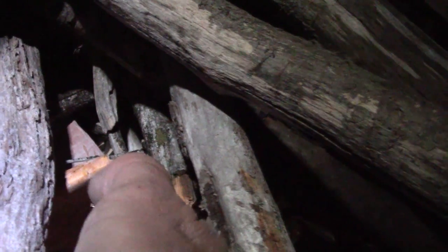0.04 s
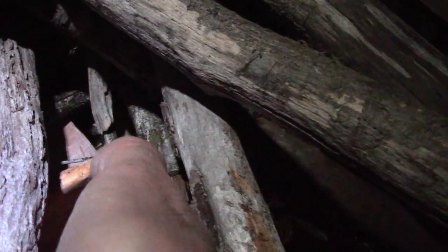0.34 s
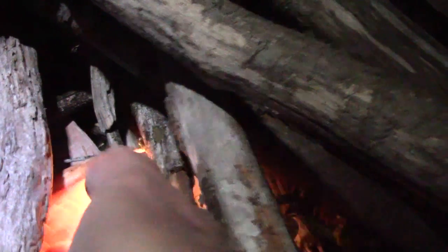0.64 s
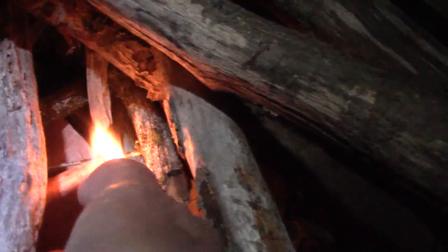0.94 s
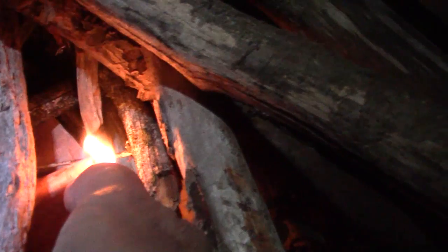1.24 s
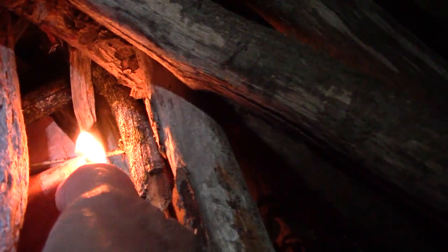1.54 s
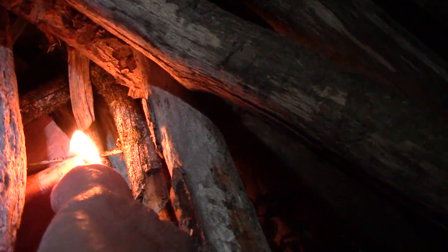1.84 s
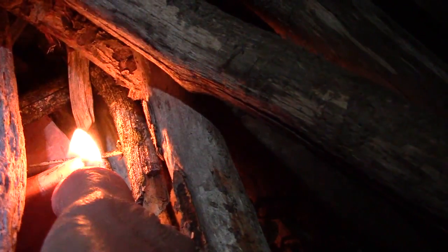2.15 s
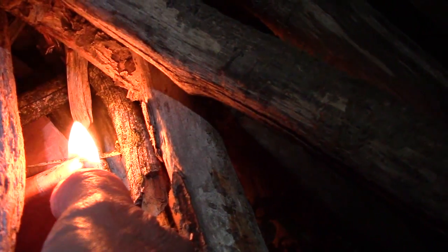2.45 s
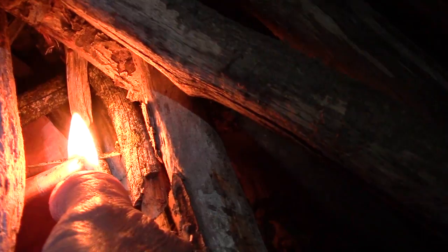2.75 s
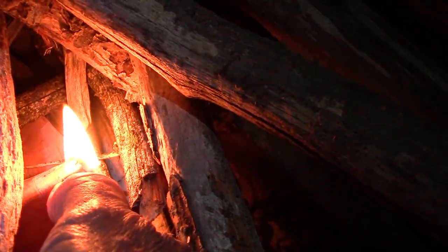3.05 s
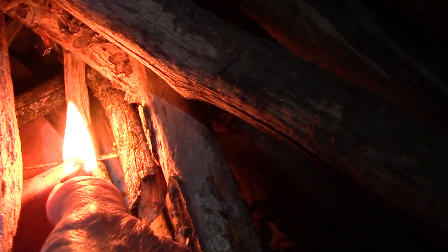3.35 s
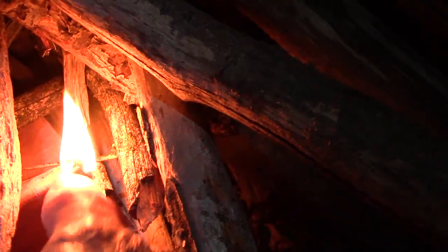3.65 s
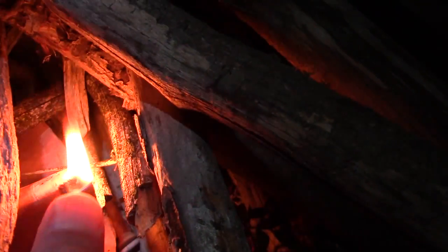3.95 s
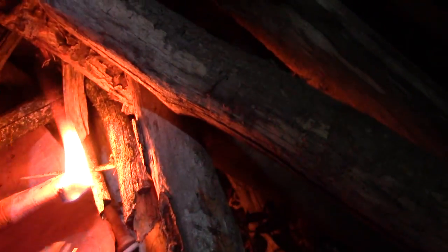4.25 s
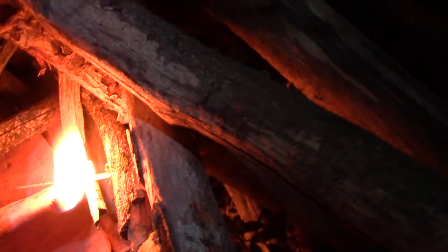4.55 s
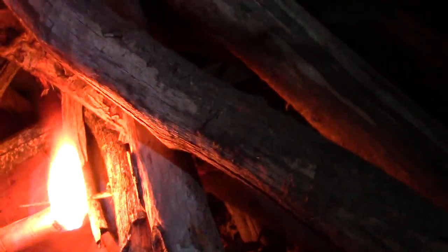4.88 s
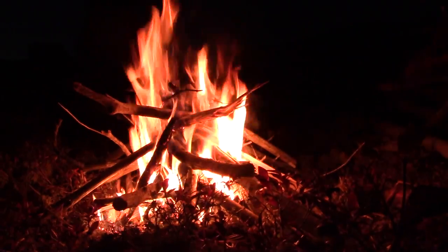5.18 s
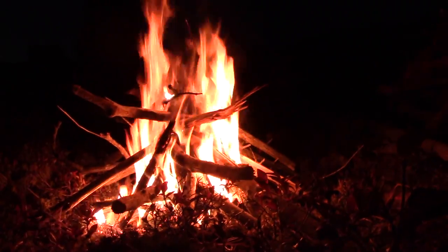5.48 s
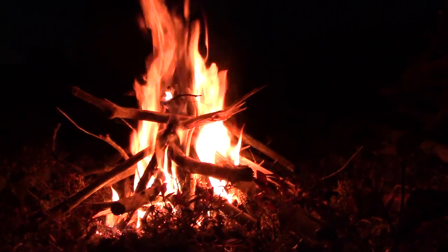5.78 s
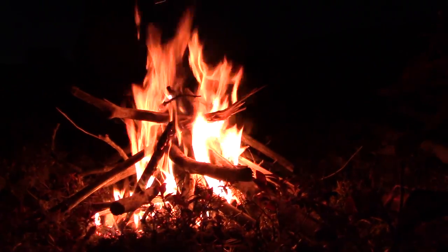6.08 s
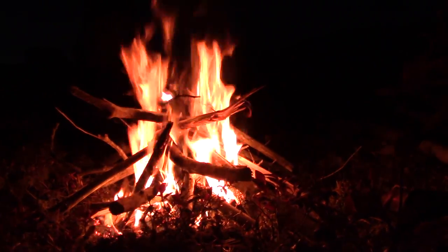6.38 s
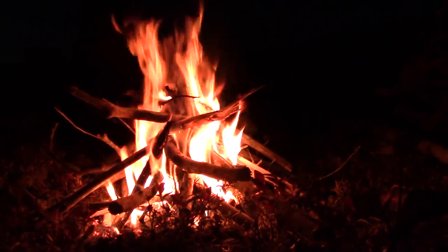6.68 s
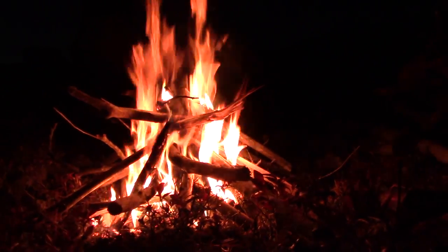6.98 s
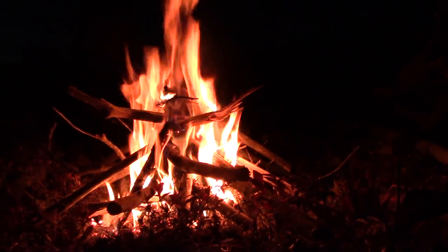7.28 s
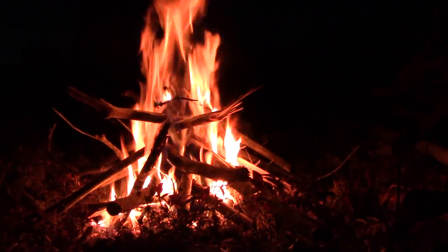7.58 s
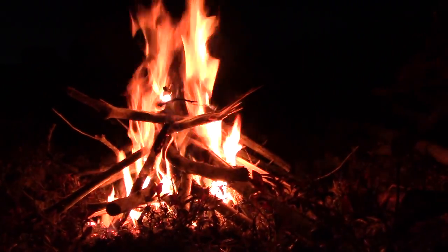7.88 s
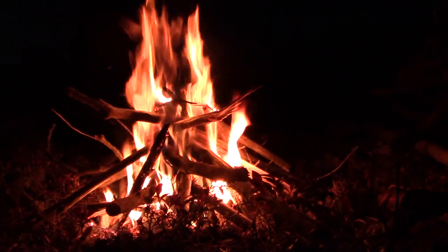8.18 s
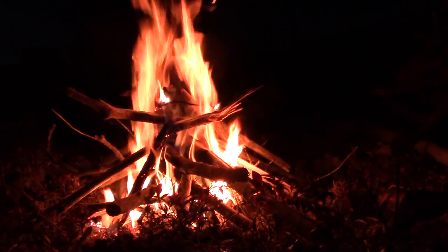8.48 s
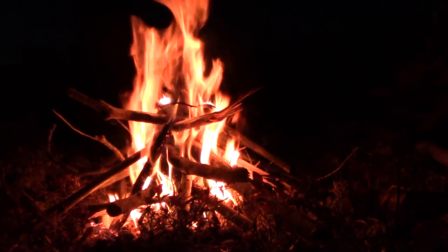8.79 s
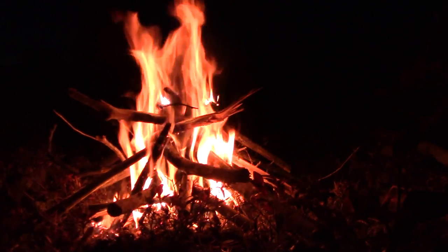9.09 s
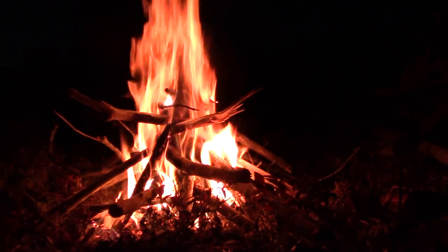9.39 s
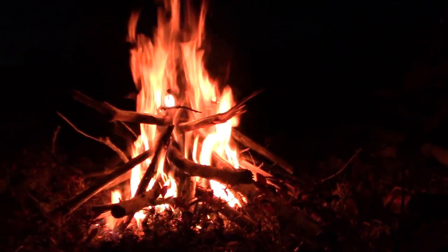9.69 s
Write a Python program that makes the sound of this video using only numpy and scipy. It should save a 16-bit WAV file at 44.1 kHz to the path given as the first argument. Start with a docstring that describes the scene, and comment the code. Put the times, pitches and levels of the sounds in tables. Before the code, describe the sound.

Outdoors at night, close to the microphone, a hand knocks lightly on sticks and a lighter's flint is struck. Gas hisses faintly while the kindling catches with a burst of loud, sharp snaps. The lever gives a tiny squeak and the hand rubs past the wood. Then a grown campfire is heard from a few steps away: a soft, low flutter of flames, fine crackling and occasional pops. A distant cricket is barely audible.

```python
"""A campfire outdoors at night. Close to the microphone a gas lighter hisses and goes out, a hand knocks
on the sticks, and the flint is struck again. A cricket chirps far off, and the kindling starts to snap
in the flame. The lever squeaks as it is let go and the hand rubs past the sticks. At 5 s the scene
changes to the fire well alight, a few steps away: a low fluttering rush of flames, the fine crackle of
boiling sap and breaking fibres, now and then a sharper pop, and the cricket again."""
import sys
import numpy as np
from scipy import signal
from scipy.fft import rfft, irfft, next_fast_len
from scipy.io import wavfile

SR = 44100
rng = np.random.default_rng(int(sys.argv[2]) if len(sys.argv) > 2 else 0)


def to_wav(s):
    """Save 16-bit WAV."""
    ch = np.atleast_2d(s).T  # columns
    pcm = np.round(np.clip(ch, -1, 1) * 32767)  # PCM
    wavfile.write(sys.argv[1], SR, pcm.astype(np.int16))


N = 437913
TIME = np.arange(N) / SR

# spectrum of boiling sap and tiny breaking fibres: frequency_hz, level_db
SIZZLE_SPECTRUM = [(1000, -9.5), (3000, -6.5), (4400, -10), (5400, -5), (7000, -4), (8700, -3.5),
                   (10000, -5.5), (11500, -10), (14000, -13), (16000, -18)]
# stereo width of the fire from a few steps away: frequency_hz, side_db
FIRE_WIDTH = [(60, -25), (200, -24), (380, -18.5), (700, -8.5), (1300, -6), (2400, -8.5), (4400, -10.5),
              (8100, -32), (15000, -16)]


def amp(db):
    """Decibels to gain."""
    return 10 ** (np.asarray(db) / 20)


def unit_rms(x):
    """Scales to rms 1."""
    return x / np.sqrt(np.mean(x ** 2) + 1e-20)


def curve_at(points, hz):
    """Reads a spectrum whose points are joined by straight lines over log frequency."""
    freqs, values = np.transpose(points)
    return np.interp(np.log(hz + 1), np.log(freqs + 1), values)


def add(mix, start_s, sound):
    """Mixes a sound in at a time."""
    part = mix[..., max(round(start_s * SR), 0):][..., :sound.shape[-1]]
    part += sound[..., :part.shape[-1]]


def drift(top_hz):
    """Random wander of rms 1, no faster than top_hz."""
    hz = np.fft.rfftfreq(N, 1 / SR)
    return unit_rms(irfft(rfft(rng.standard_normal(N)) * (hz < top_hz), N))


def swell(start_s, end_s, rise_s, release_s):
    """Rises evenly, holds to the end, then dies away."""
    rise = np.clip((TIME - start_s) / rise_s, 0, 1)
    return rise * np.exp(-np.maximum(TIME - end_s, 0) / release_s)


def shaped(x, gain):
    """Filters by the spectrum gain(hz)."""
    size = next_fast_len(N)
    return irfft(rfft(x, size) * gain(np.fft.rfftfreq(size, 1 / SR)), size)[..., :N]


def coloured(drive, spectrum):
    """Gives a drive a broad spectrum, rms 1."""
    return unit_rms(shaped(drive, lambda hz: amp(curve_at(spectrum, hz))))


def resonant_noise(modes):
    """Noise passed through resonances, rms 1."""
    def gain(hz):
        powers = (amp(2 * db) / (1 + ((hz - centre) / (0.49 * width)) ** 2) ** 2
                  for centre, width, db in modes)
        return np.sqrt(sum(powers))
    return unit_rms(shaped(rng.standard_normal(N), gain))


def stereo(mid, side, width):
    """Left and right from a shared sound and a differing one."""
    side = shaped(side, lambda hz: amp(curve_at(width, hz)))
    return np.array([mid + side, mid - side])


def diffuse_noise(spectrum, width):
    """Stereo noise that reaches the microphone from all around."""
    return stereo(*coloured(rng.standard_normal((2, N)), spectrum), width)


def at_microphone(x, width, taps=160):
    """The two sides of the microphone hear a point source with slightly different reflections."""
    reflections = rng.standard_normal(taps) * np.exp(-3 * np.arange(taps) / taps)
    return stereo(x, signal.lfilter(reflections / np.linalg.norm(reflections), 1, x), width)


def scatter(x, wet_db, t60_s):
    """Logs and ground throw back a short diffuse tail, different on each side."""
    t = np.arange(SR // 5) / SR
    tail = rng.standard_normal((2, len(t))) * amp(-60 * t / t60_s) * (1 - np.exp(-t / .001))
    return amp(wet_db) * signal.oaconvolve(x[None], tail / np.linalg.norm(tail[0]), axes=1)[:, :N]


def friction(grit, per_s):
    """Smooth noise plus tiny slips of uneven size."""
    slips = (rng.random(N) < per_s / SR) * amp(6 * np.minimum(rng.exponential(1, N), 3))
    return unit_rms(rng.standard_normal(N) + grit * unit_rms(slips * rng.standard_normal(N)))


def crack(colour_db, ring_ms, ring=1.4, size=2048):
    """A fibre breaks: one sharp step, then the stick rings briefly. Energy 1."""
    t = np.arange(size) / SR
    tail = rng.standard_normal(size) * np.exp(-t * 1000 / ring_ms)
    drive = ring * ring_ms * tail / np.linalg.norm(tail)
    drive[0] += 1
    log_gain = np.log(amp(colour_db(abs(np.fft.fftfreq(size, 1 / SR)))))
    causal = np.exp(np.conj(signal.hilbert(log_gain)))  # nothing sounds before the break
    sound = np.fft.ifft(np.fft.fft(drive) * causal).real
    return sound / np.linalg.norm(sound)


def cracks(rows, gain_db, ring, low_db, low_per_db, low_per_body, mid_db, note_db, note_width_hz):
    """Plays a table of cracks; each stick has one strong note, and louder, thicker ones reach lower."""
    # spectrum of snapping wood: frequency_hz, level_db
    snap = [(60, -45.5), (300, -13.5), (900, -9), (1800, 0), (2400, 0), (3700, -1.5), (5300, -5),
            (6800, -0.5), (8800, 0), (10300, -2.5), (12000, -9.5), (14000, -13.5), (16000, -26.5)]
    out = np.zeros(N)
    for start_s, db, body_db, ring_ms, note_hz in rows:
        bass_db = low_db + low_per_db * db + low_per_body * body_db
        tilt = [(1600, bass_db), (3800, body_db + mid_db), (7500, 0)]
        sings_db = note_db * min(ring_ms / 0.5, 1)  # the driest cracks have hardly any note

        def colour_db(hz):
            note = sings_db / (1 + ((hz - note_hz) / note_width_hz) ** 2)
            return curve_at(snap, hz) + curve_at(tilt, hz) + note
        add(out, start_s, amp(db + gain_db) * crack(colour_db, ring_ms, ring))
    return out


def air_pushes(rows, cycles):
    """Each row is a low push and pull of air, with its deepest bass filtered away."""
    out = np.zeros(N)
    t = np.arange(-SR // 20, SR // 20) / SR
    for middle_s, db, hz in rows:
        envelope = np.exp(-(2 * hz * t / cycles) ** 2)
        add(out, middle_s + t[0], amp(db) * np.sin(2 * np.pi * hz * t) * envelope)
    return shaped(out, lambda hz: hz ** 4 / (hz ** 4 + 65 ** 4))


def night_air(level_db=-59.5):
    """The faint, slightly wavering hush of the open air."""
    # spectrum of the hush: frequency_hz, level_db
    spectrum = [(20, -31.5), (60, -14.5), (130, -2.5), (300, 2), (700, -1.5), (1400, -4), (2500, -9.5),
                (4500, -12.5), (8000, -15), (11000, -20), (16000, -28.5)]
    # its stereo width: frequency_hz, side_db
    width = [(60, -5), (700, -6.5), (2400, -10), (8000, -21), (15000, -18.5)]
    return amp(level_db) * diffuse_noise(spectrum, width) * amp(0.91 * drift(7.1))


def lighter(jet_db=-8.5, jet_hz=9800, jet_width_hz=800, sink_hz_per_s=220, sag_db_per_s=1):
    """Gas hisses through the hood while the lever is down, sinking and weakening as the pressure drops."""
    # resonances of the nozzle and hood: pitch_hz, width_hz, level_db
    hood_modes = [(1430, 550, -6), (2287, 580, 2.5), (3220, 810, -3), (3944, 550, -8), (7150, 1100, -14.5),
                  (12100, 1400, -19), (14200, 900, -22)]
    # the gas lever is held down: start_s, end_s, level_db, brightness_db
    burns = [(0.0, 0.21, -58, 4.5), (.835, 3.86, -57, 0)]
    hood = resonant_noise(hood_modes)
    band = unit_rms(shaped(rng.standard_normal(N), lambda hz: 1 / (1 + (hz / jet_width_hz) ** 4)))
    band *= amp(1.5 * drift(18))
    out = np.zeros(N)
    for start_s, end_s, db, bright_db in burns:
        age = np.clip(TIME - start_s, 0, end_s - start_s)
        flow = swell(start_s, end_s, rise_s=0.024, release_s=.04) * amp(db - sag_db_per_s * age)
        turns = np.cumsum(jet_hz - sink_hz_per_s * age) / SR
        jet = band * unit_rms(np.cos(2 * np.pi * turns))  # moves the band up to a fine hiss
        out += flow * (hood + amp(jet_db + bright_db) * jet)
    return out * amp(0.76 * drift(25))


def stick_knocks():
    """Hand and lighter knock on the sticks, which ring briefly."""
    # knocks: start_s, level_db, body_db, ring_ms, note_hz
    knocks = [(.2039, -23.5, 16, 1.1, 3220), (.2556, -20, 5, 1.4, 4010), (.2668, -19, 16, .9, 3300),
              (.3, -21, -2.5, 3.9, 3230), (.7641, -26, 2, 2, 2930), (.773, -22, 5, 1.1, 7900),
              (.885, -23.5, 3, .5, 2230), (.8972, -23, 6, 1.6, 7160), (1.0272, -20, 14, 0.75, 3250),
              (1.0958, -27, 12, 1.7, 3260), (3.8734, -23.5, 4, 2.1, 4690), (3.8852, -20, -1, 1.5, 3060),
              (4.4883, -21, 14, 1.1, 2170), (4.6042, -20.5, -7, 1.3, 5700), (4.6462, -19, 21, 1.3, 2050)]
    return cracks(knocks, gain_db=2.0, ring=1.9, low_db=7, low_per_db=0.6, low_per_body=1.5,
                  mid_db=2.0, note_db=11.0, note_width_hz=190)


def hand_rub(skin_db=-2.5, sticks_db=-9.0, scrape_db=-2.5):
    """Skin sticks and slips on bark and sets the sticks ringing; now and then one catches."""
    # strokes of the hand along the wood: start_s, end_s, level_db, rise_s, release_s
    strokes = [(0.213, .335, -55.5, .04, .015), (0.434, 0.494, -55, 0.058, 0.035),
               (3.85, 3.913, -55.5, .03, 0.022), (3.96, 4.13, -61, .13, 0.15),
               (4.246, 4.61, -50.5, .19, .015), (4.613, 4.68, -48, .02, 0.018),
               (4.687, 4.737, -46.5, 0.034, 0.015), (4.765, 4.841, -50, 0.028, .014)]
    # spectrum of skin on bark: frequency_hz, level_db
    skin_spectrum = [(60, -3), (300, 6), (750, 1.5), (1100, 2), (1500, 2.5), (2150, -2), (2900, -2.5),
                     (4200, -2), (5800, 2), (8500, -5), (11000, -4.5), (16000, -17)]
    # resonances of the rubbed sticks: pitch_hz, width_hz, level_db
    stick_modes = [(1010, 66, -2), (2180, 250, -1.5), (2880, 120, -8), (3430, 120, -5), (6050, 860, -10)]
    # one stick catches and rings: middle_s, level_db, pitch_hz, half_length_ms
    scrapes = [(4.10, -62, 7160, 70), (4.135, -60, 2180, 14), (4.559, -53, 2110, 15), (4.58, -52, 1020, 20),
               (4.605, -53, 995, 14), (4.633, -58, 1010, 16), (4.648, -50, 2100, 16),
               (4.678, -50, 6300, 16), (4.72, -54, 2120, 26), (4.723, -52, 1010, 26), (4.793, -52, 990, 32),
               (4.81, -65, 2140, 18)]
    force = sum(amp(db) * swell(start, end, rise, release) for start, end, db, rise, release in strokes)
    skin = coloured(friction(grit=0.72, per_s=2000), skin_spectrum) * amp(3.0 * drift(59.9))
    sticks = resonant_noise(stick_modes) * amp(2.0 * drift(40.7))
    out = force * (amp(skin_db) * skin + amp(sticks_db) * sticks)
    for middle_s, db, hz, half_ms in scrapes:
        t = np.arange(-half_ms, half_ms, 1000 / SR) / 1000
        rough = signal.lfilter(*signal.iirpeak(hz, 9, SR), rng.standard_normal(SR // 4))[-len(t):]
        add(out, middle_s + t[0], amp(db + scrape_db) * unit_rms(rough * np.hanning(len(t))))
    return shaped(out, lambda hz: hz ** 2 / (hz ** 2 + 70 ** 2))


def log_thuds():
    """The hand bumps softly against a log."""
    # thuds: middle_s, level_db, pitch_hz
    thuds = [(.2705, -40, 430), (4.655, -39.5, 382)]
    return air_pushes(thuds, cycles=2.1)


def flint_strike(start_s=.76, spark_s=.8315, drag_db_per_s=300.5, bite_db_per_s=2700, stop_db_per_s=2200):
    """The wheel rasps ever faster over the flint, bites hard and stops; the flame flaps into life."""
    # spectrum of the flint's rasp: frequency_hz, level_db
    flint_spectrum = [(60, -24), (500, -7), (1000, -10), (2300, -6.5), (3500, -6), (6000, -6), (8500, -6),
                      (10000, -9), (11300, -6), (12500, -18.5), (16000, -20.5)]
    # resonances of the steel wheel: pitch_hz, width_hz, level_db
    steel_modes = [(2300, 220, -4), (2920, 250, -4.5), (3450, 200, -3.5), (4130, 270, -3.5),
                   (5100, 230, -6.5), (7100, 350, 0), (8060, 220, -1.5), (8200, 200, -2), (8850, 500, -1),
                   (10968, 240, 0.5), (11200, 220, 0), (11650, 200, -5.5), (13650, 300, -10)]
    # spectrum of the new flame: frequency_hz, level_db
    flap_spectrum = [(20, -32), (60, -2.5), (100, -1.5), (160, -8.5), (300, -5), (700, -20.5),
                     (2000, -65.5)]
    before, after = np.maximum(spark_s - TIME, 0), np.maximum(TIME - spark_s, 0)
    stop = amp(-stop_db_per_s * np.minimum(after, .2))
    drag = amp(-36 - drag_db_per_s * before) * (TIME > start_s) * stop
    bite = amp(-10.5 - bite_db_per_s * before) * stop
    flint = coloured(friction(grit=0.7, per_s=4500), flint_spectrum)
    rasp = amp(-6) * flint + amp(-2) * resonant_noise(steel_modes)
    slow_rasp = coloured(rasp, [(1500, 0), (2900, 5), (5500, 0)])  # the slow wheel is duller
    flap = amp(-52) * coloured(rng.standard_normal(N), flap_spectrum)
    flap *= swell(spark_s, spark_s + 0.055, rise_s=.004, release_s=.015)
    return slow_rasp * drag + rasp * bite + flap


def gas_puffs():
    """Burning gas puffs suddenly and pushes the air."""
    # puffs: middle_s, level_db, pitch_hz
    puffs = [(0.8345, -18.5, 325), (.872, -40, 210), (2.2252, -30, 325), (2.347, -23, 330),
             (2.430, -41, 237), (3.210, -36.5, 327), (5.169, -32.5, 221), (7.059, -33.5, 302),
             (7.6725, -34.5, 555), (7.746, -31.5, 266), (8.027, -40, 205), (8.871, -31.5, 247),
             (8.948, -34, 173), (9.237, -33.5, 260), (9.667, -33, 270), (9.716, -34, 201)]
    return air_pushes(puffs, cycles=0.82)


def cricket(pitch_hz=5570, chirp_s=.09):
    """Far away the wing strokes blur into one soft, slightly unsteady note."""
    # chirps: middle_s, level_db
    chirps = [(1.55, -73), (1.67, -74), (7.47, -72.5), (7.59, -82), (8.44, -76)]
    gate = sum(amp(db) * np.exp(-(2.5 * (TIME - middle_s) / chirp_s) ** 4) for middle_s, db in chirps)
    turns = np.cumsum(pitch_hz * (1 + 0.0069 * drift(96))) / SR
    return gate * unit_rms(np.sin(2 * np.pi * turns))


def wood_pops():
    """Wood snaps sharply in the heat."""
    # snaps: start_s, level_db, body_db, ring_ms, note_hz
    pops = [(1.7569, -0.5, -2.5, 1.36, 3900), (1.7818, -1, 0, 1.6, 3580), (2.0058, -7.5, -4.5, 1.3, 4420),
            (2.0668, 0, 6.5, 2.8, 9200), (2.072, 3.5, -3.5, 2, 3530), (2.205, -21.5, -9, 0.25, 9100),
            (2.2177, -2.5, -1.5, 1.1, 9090), (2.3445, -0.5, 0, 1.2, 3920), (2.3491, -7, 4, 1.2, 9300),
            (2.3961, -6, -9, 0.8, 9300), (2.3993, -7, -1, .3, 9390), (2.4114, -12, -10, .7, 6590),
            (2.4258, -5, 2, 0.88, 9200), (2.4783, -5, -2, 1.3, 10100), (2.4868, -11, -11, .3, 9500),
            (2.5298, -3, 1, 1.13, 9400), (2.64, -19, -16, 0.67, 9950), (2.6505, -8.5, -4.5, 1.8, 3340),
            (2.6883, -10.5, 1, 0.94, 9450), (2.6975, -20.5, 3, 2, 10000), (2.8338, -21.5, -12, .5, 9600),
            (2.8581, -14.5, -4, 1.3, 9090), (2.8776, -13.5, -8, 0.69, 9170), (2.9795, -21, -9, .6, 9300),
            (3.003, -18.5, -6, 0.4, 9300), (3.2058, -8.5, 4, 1.1, 9100), (3.3829, -21, 4, 2.7, 6440),
            (3.4325, -22.5, 1, 1, 9300), (4.2747, -23.5, -3, 0.092, 8870), (4.966, -19, -4, 0.34, 7190),
            (5.0715, -27.5, -12, 1.2, 8550), (5.148, -27.5, -24, .3, 8570), (5.1914, -28, -22, .5, 8480),
            (5.371, -27, -9, .3, 6900), (5.5219, -28, 2, 1.1, 6850), (5.5683, -29, -12, 0.43, 8350),
            (5.745, -28, -24, .9, 8400), (5.8972, -20.5, -3, 0.11, 7180), (6.2326, -18.5, -13, 0.22, 8100),
            (6.2903, -18.5, -5.5, 0.31, 5500), (6.4676, -28.5, -24, .6, 8480),
            (6.6045, -28.5, -2, .26, 8440), (6.7016, -21.5, 3, .2, 7200), (6.9502, -28, -24, .8, 8950),
            (7.3425, -28, -12, .2, 9560), (7.6719, -8, 3, 0.11, 3270), (7.8633, -25, -8, .4, 8850),
            (7.9505, -27, -5, .8, 7900), (8.2101, -18.5, 3, 0.79, 7920), (8.8452, -26, -11, .35, 6850),
            (9.3074, -27, -9, 0.46, 10000), (9.4524, -23.5, 3, .6, 7050), (9.5641, -25.5, 1, 0.22, 7200),
            (9.6863, -28.5, -3, .1, 6850), (9.8291, -18, 0, 0.54, 7300), (9.8608, -21.5, -5, .14, 6720),
            (9.8979, -29, -4, .9, 6070)]
    return cracks(pops, gain_db=0.72, ring=1.2, low_db=-0.5, low_per_db=0.3, low_per_body=.3,
                  mid_db=2.4, note_db=8.5, note_width_hz=600)


def twig_ticks(start_s=2.2, per_s=18, tick_db=-37, spread_db=2.0, ring_ms=.77, count=100):
    """Thin fibres tick at random once the flame has reached them."""
    gaps, sizes = rng.exponential(1, (count, 2)).T
    out = np.zeros(N)
    for tick_s, size in zip(start_s + np.cumsum(gaps) / per_s, np.minimum(sizes, 2.8)):
        tick = crack(lambda hz: curve_at(SIZZLE_SPECTRUM, hz), ring_ms)
        add(out, tick_s, amp(tick_db + spread_db * size) * tick)
    return out


def lever_squeak(start_s=3.874, end_s=3.924, db=-52, fade_db_per_s=110, pitch_hz=3130, sag_hz_per_s=3000):
    """A short, rough whistle of the lever's pivot as it is let go, sinking and fading."""
    age = np.clip(TIME - start_s, 0, .1)
    turns = np.cumsum((pitch_hz - sag_hz_per_s * age) * (1 + 0.043 * drift(440))) / SR
    envelope = swell(start_s, end_s, rise_s=0.0071, release_s=0.0027) * amp(db - fade_db_per_s * age)
    return unit_rms(np.sin(2 * np.pi * turns)) * envelope * amp(2.9 * drift(300))


def flames(low_db=-50.66, hiss_db=-48, flutter_db=2.77, flutter_hz=60, swell_db=0.8, swell_hz=3.6):
    """Turbulent burning: the low rush flutters in quick bursts, its hiss stays steadier."""
    # spectrum of the flames: frequency_hz, level_db
    spectrum = [(15, -58), (25, -43), (98, -3.5), (181, 1), (354, -1.5), (512, -7.5), (774, -18.5),
                (882, -20), (1300, -25), (1490, -21.5), (1620, -25), (2200, -29), (4500, -33), (5850, -41),
                (9900, -120)]
    rush = diffuse_noise(spectrum, FIRE_WIDTH)
    low = shaped(rush, lambda hz: 1 / (1 + (hz / 850) ** 4))
    flutter = unit_rms(amp(flutter_db * drift(flutter_hz) + swell_db * drift(swell_hz)))
    return amp(low_db) * low * flutter + amp(hiss_db) * (rush - low) * flutter ** 0.63


def crackle(per_s=380, spread_db=5.5, crackle_db=-2.3, hiss_db=-9.0, pitches=40):
    """Sap boils and countless small fibres break at scattered pitches."""
    # how hard the sap boils: time_s, level_db
    boiling = [(5.1, -62.5), (6.15, -59.5), (6.45, -62), (6.85, -59.5), (7.4, -62.5), (7.85, -59),
               (8.8, -64), (9.05, -60.5), (9.9, -60.5)]
    breaks = rng.random(N) < per_s / SR * amp(2.5 * drift(12))
    sizes = amp(spread_db * np.minimum(rng.exponential(1, N), 3.6))
    fibre = rng.integers(0, pitches, N)
    ticks = []
    for centre_hz, ring_ms in zip(np.geomspace(6200, 10800, pitches), rng.uniform(.3, 1.1, pitches)):
        def colour_db(hz):
            return curve_at(SIZZLE_SPECTRUM, hz) + 8 * np.exp(-((hz - centre_hz) / 1500) ** 2)
        ticks.append(crack(colour_db, ring_ms, ring=3.7))
    out = np.zeros(N)
    for i in np.flatnonzero(breaks):
        add(out, i / SR, sizes[i] * ticks[fibre[i]])
    grains = at_microphone(unit_rms(out), FIRE_WIDTH)
    hiss = diffuse_noise(SIZZLE_SPECTRUM, FIRE_WIDTH)
    boil = amp(np.interp(TIME, *np.transpose(boiling)))
    return boil * (amp(crackle_db) * grains + amp(hiss_db) * hiss)


def scene(lighting_end_s=5.0, blaze_start_s=5.013):
    """The lighting from close by, a brief dip in level, then the grown fire from a few steps away."""
    # stereo width of sounds near the microphone: frequency_hz, side_db
    near_width = [(100, -48.5), (700, -17.5), (2400, -45), (4400, -24), (8000, -29.5), (15000, -7.5)]
    pops, knocks, strike, puffs = wood_pops(), stick_knocks(), flint_strike(), gas_puffs()
    handling = knocks + lighter() + strike + lever_squeak() + hand_rub() + log_thuds()
    close = at_microphone(handling + puffs + pops + twig_ticks(), near_width)
    close += scatter(pops + knocks, wet_db=-22.5, t60_s=0.022)
    close += scatter(strike, wet_db=-24, t60_s=.11)
    air = night_air()
    lighting = close * amp([[.4], [-.4]]) + air  # a touch to the left
    blaze = at_microphone(pops + puffs, near_width) + scatter(pops, wet_db=-21.5, t60_s=0.018)
    blaze += flames() + crackle()
    dip = amp(-22) * air
    return np.where(TIME < lighting_end_s, lighting, np.where(TIME > blaze_start_s, blaze, dip)) + cricket()


def record(dry, headroom=.88, top_hz=15900):
    """The microphone's headroom clips the sharpest peaks, and the highest treble is filtered off."""
    lowpass = signal.firwin(255, top_hz, window=("kaiser", 8), fs=SR)
    return signal.oaconvolve(np.clip(dry, -headroom, headroom), lowpass[None], "same")


dry = scene()
out = record(dry)
to_wav(out)
```